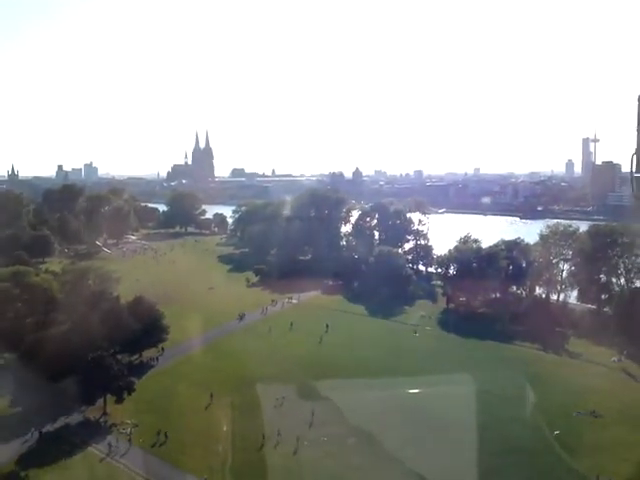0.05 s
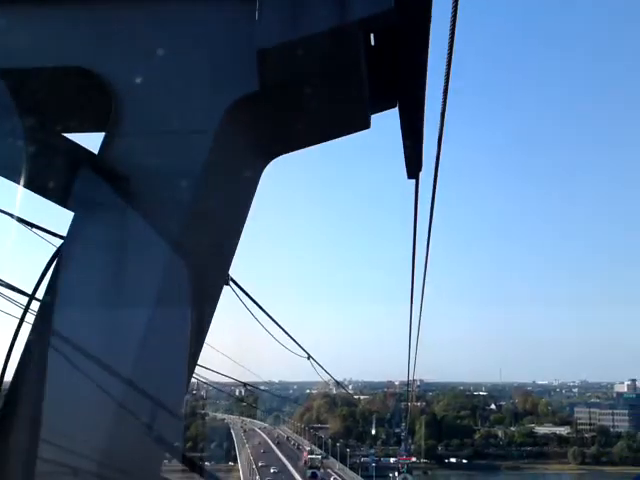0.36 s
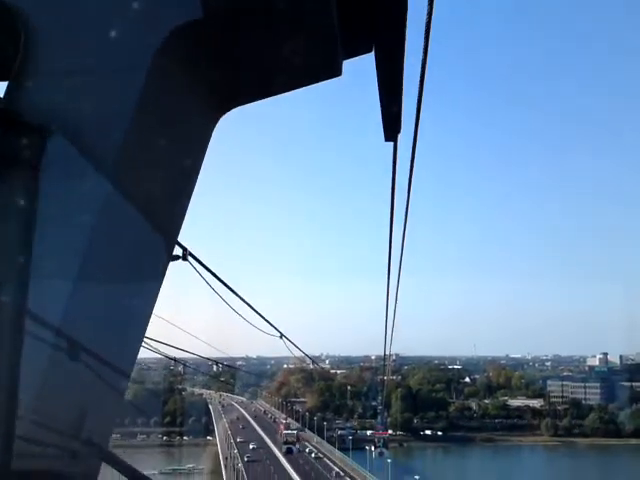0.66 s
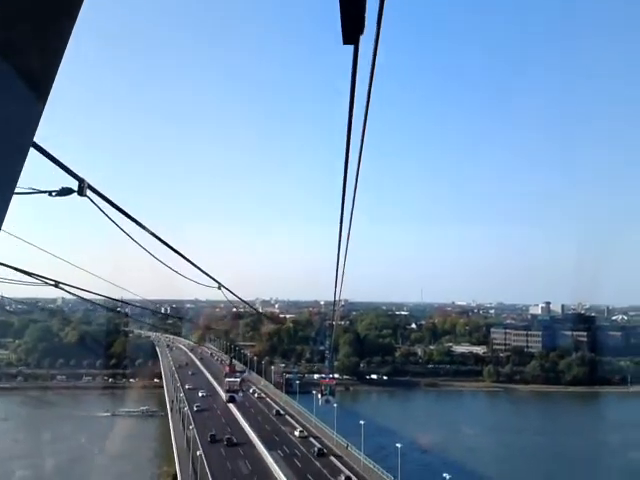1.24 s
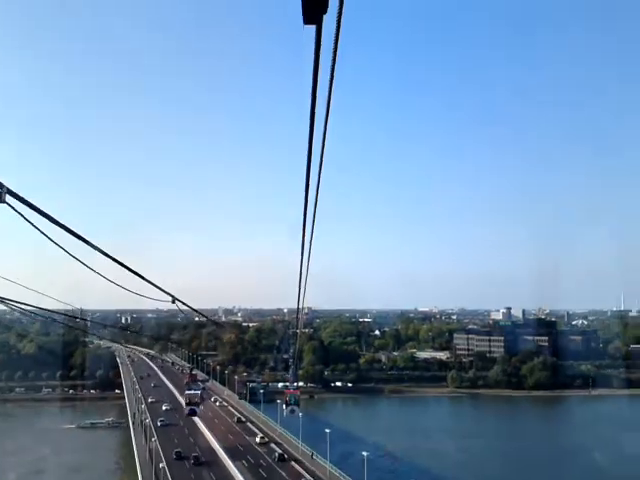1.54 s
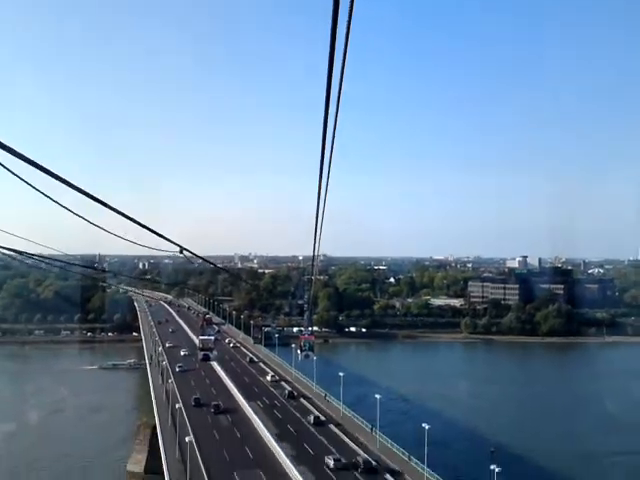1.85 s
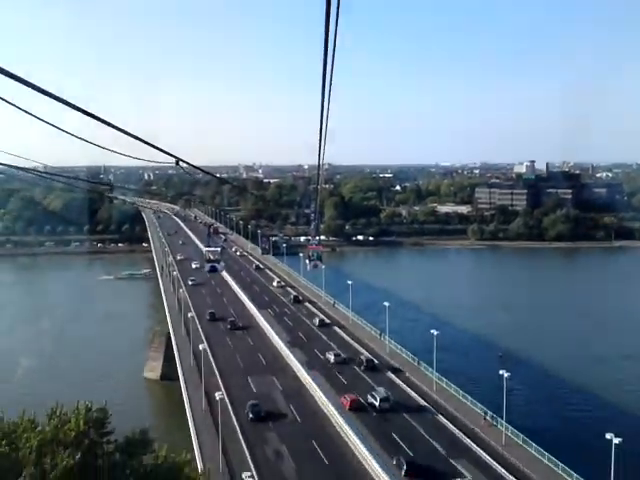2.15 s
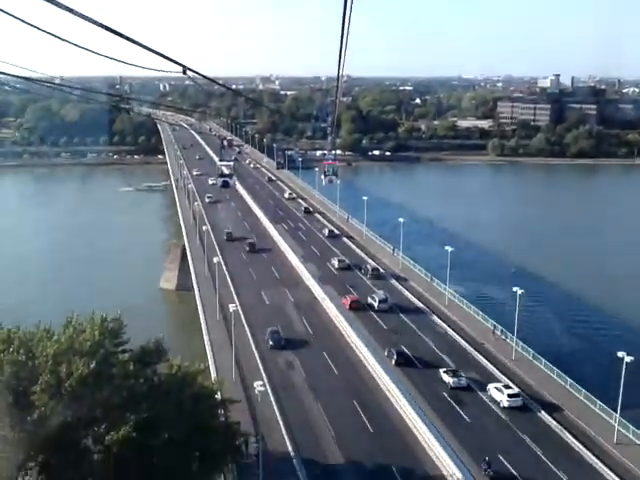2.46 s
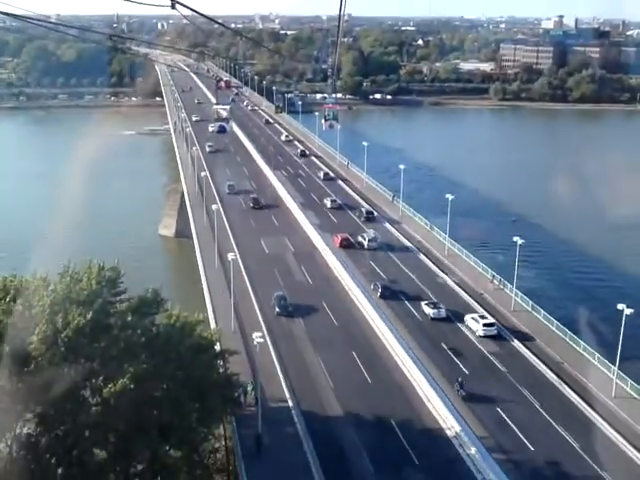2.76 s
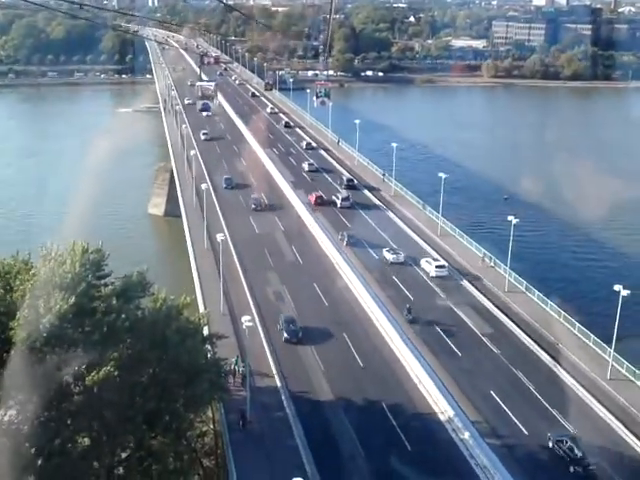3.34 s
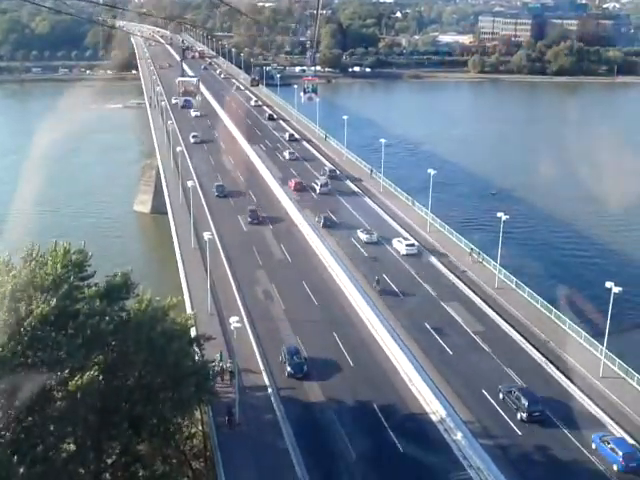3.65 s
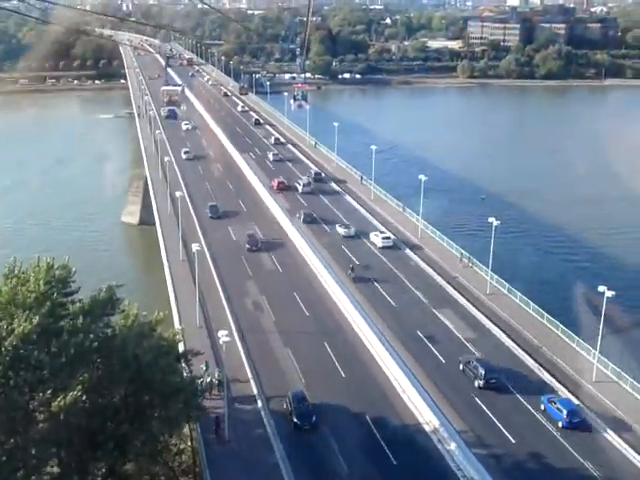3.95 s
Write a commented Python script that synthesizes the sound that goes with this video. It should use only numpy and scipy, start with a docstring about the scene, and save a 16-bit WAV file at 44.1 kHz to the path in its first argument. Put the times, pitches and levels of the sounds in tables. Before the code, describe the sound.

Low rumble of wind and running gear fills a moving cable car cabin, the microphone inside. After one close click, it swells with a droning rope and several knocks on the walls, while traffic washes softly far below.

```python
"""Cable car cabin over a river.

Wind and running gear shake the cabin; its low resonances rumble in swells. The haul rope drones and
the gear hums, both climbing a little. Traffic washes in from far below, something small rubs and
clicks close by, and jolts knock the walls. The sound cuts out twice, very briefly, at the start."""
import sys
import numpy as np
from scipy import signal
from scipy.fft import rfft, irfft
from scipy.io import wavfile
from scipy.ndimage import uniform_filter1d

SR = 44100
rng = np.random.default_rng(int(sys.argv[2]) if len(sys.argv) > 2 else 0)


def generate_wav(signal):
    """Clip the signal to [-1, 1] and save it as 16-bit WAV at the path in sys.argv[1]."""
    frames = np.transpose(np.atleast_2d(signal))
    scaled = np.clip(frames, -1, 1) * 32767
    pcm = np.round(scaled).astype(np.int16)
    wavfile.write(sys.argv[1], SR, pcm)


N = 176400

# Cabin shaking. Each row: time in seconds, gain in dB.
CABIN_SHAKE = [(0, -6.5), (.22, -5.5), (.28, -6.5), (.42, 0.5), (.53, -4), (.85, -4.5), (.97, -1),
               (1.07, -4), (1.38, -6), (1.48, 1.5), (1.6, -6.5), (1.72, 4.5), (1.88, 3.5), (2.05, -2),
               (2.15, 2), (2.25, 8.5), (2.42, 2), (2.55, 6), (3.15, 1), (3.3, 0.5), (3.41, 7), (3.51, -3),
               (3.66, 8.5), (3.82, 2.5), (4, 0.5)]
# Cabin resonances. Each row: centre in Hz, width in Hz, relative level in dB.
CABIN_MODES = [(26.3, 6.1, -9.5), (50.45, 2.8, -3), (72.6, 9.8, 1), (123.4, 22, -4.5), (158.9, 10, -2),
               (209.6, 16, -9.5), (239.9, 11, -5.5), (298.6, 32, -4), (348, 15, -14)]
# Broad rumble between them. Each row: frequency in Hz, relative density in dB.
RUMBLE_SPECTRUM = [(12, -24.5), (26, -1), (36, -7), (48, -3), (90, 4), (190, -5), (330, -7), (450, -10.5),
                   (650, -16.5), (1200, -29), (2500, -79)]
# Haul rope drone. Each row: time in seconds, pitch in Hz, level in dB.
ROPE_TRACK = [(0, 121.3, -71), (.6, 121, -60), (.8, 121, -54.5), (1.15, 119.9, -53.5), (1.7, 120, -50.5),
              (1.82, 121.1, -47), (1.96, 119.2, -44.5), (2.1, 121, -54), (2.36, 122.3, -41.5),
              (2.5, 121.5, -47), (2.65, 122.5, -51), (2.85, 124.6, -48), (3.2, 124.8, -46.5),
              (3.33, 123.7, -48), (3.55, 125.4, -50.5), (4, 124.9, -51.5)]
# Running gear hum. Each row: time in seconds, pitch in Hz, level in dB.
GEAR_TRACK = [(0, 293, -44.5), (.15, 282.8, -54), (.2, 289.8, -43.5), (.3, 297, -50.5), (.48, 295.8, -60),
              (.58, 292, -48), (.75, 291, -47.5), (.92, 292.5, -43.5), (1.03, 292.9, -61), (1.12, 290, -45),
              (1.26, 293.5, -64.5), (1.35, 292, -48.5), (1.55, 290, -62.5), (1.97, 289.3, -63),
              (2.066, 290, -41.5), (2.11, 290.6, -48.5), (2.18, 288.5, -44.5), (2.3, 291.8, -38.5),
              (2.39, 292, -47.5), (2.51, 298.7, -39.5), (2.66, 305.1, -57.5), (2.745, 309.3, -44.5),
              (2.79, 308, -47.5), (2.85, 304.5, -40), (2.97, 306, -49), (3.03, 310.7, -40.5),
              (3.3, 307, -45), (3.55, 301.7, -50.5), (3.75, 305.6, -49.5), (4, 308, -45.5)]
# Tones heard until the second gap. Each row: pitch in Hz, level in dB.
EARLY_TONES = [(205, -54.5), (250, -58), (368, -58), (436, -61.5), (500, -59.5), (874, -65)]
# Distant traffic and air. Each row: frequency in Hz, relative density in dB.
TRAFFIC_SPECTRUM = [(100, -3.5), (400, 8), (700, 1), (1000, 2.5), (1600, 1), (2100, -3.5), (2700, -11.5),
                    (3400, -18), (4200, -23), (5000, -29), (7000, -43.5), (9000, -36.5), (10500, -49),
                    (13000, -64)]
# Hollow cabin colour on the traffic. Each row: centre in Hz, width in Hz, relative level in dB.
HOLLOW_MODES = [(484.5, 14, -3.5), (598.3, 17, -0.5), (941, 140, 0), (1058, 150, -2), (1584, 85, -2.5)]
# Faint rubs. Each row: centre in seconds, Gaussian half-width in seconds, level in dB.
RUB_EVENTS = [(0.089, .004, -71), (0.705, .025, -75.5), (0.762, 0.014, -66), (1.272, 0.0054, -76),
              (1.771, 0.014, -73), (2.25, 0.012, -80), (2.659, .015, -77), (3.421, 0.019, -71.5)]
# Hiss of the rubs. Each row: frequency in Hz, relative density in dB.
RUB_SPECTRUM = [(1500, -12), (3800, 5), (5500, -5.5), (7500, -2.5), (9500, -10.5), (11000, -22),
                (15000, -40.5)]
# Near-silent gaps. Each row: start in seconds, end in seconds.
GAP_SPANS = [(0.157, .175), (.218, .261)]
# Small hard clicks. Each row: start in seconds, peak in dB.
CLICK_EVENTS = [(0.2179, -42), (0.7667, -29.5), (0.771, -31), (0.7829, -16.5), (0.7851, -29.5)]
# Ring of a click. Each row: frequency in Hz, relative level in dB, T60 in seconds.
CLICK_RING = [(770, -3, 0.009), (1020, 10.5, 0.0043), (1620, 14, 0.0026), (2640, 19.5, 0.0036),
              (3740, 17.5, 0.0021), (7000, 18, 0.0014)]
# Knocks on the cabin. Each row: start in seconds, wall level in dB, thud level in dB.
KNOCK_EVENTS = [(1.470, -58, -35), (1.74, -46, -40), (1.795, -53, -35), (1.837, -33, -40),
                (2.215, -26.5, -44), (2.252, -49, -37), (2.306, -35.5, -31), (2.499, -32, -32),
                (2.625, -42, -46.5), (2.653, -41, -41), (3.368, -47, -38), (3.601, -31.5, -32.5),
                (3.643, -33, -40.5), (3.728, -32.5, -42), (3.880, -34.5, -33), (3.902, -32, -45)]
# Ring of a knocked wall. Each row: frequency in Hz, relative level in dB, T60 in seconds.
WALL_RING = [(350, 6, 0.054), (420, -7.5, 0.03), (628, 0.5, 0.062), (674, -3.5, 0.12), (1000, -0.5, 0.026),
             (1085, -2.5, 0.053), (1350, -3.5, .025)]
# Thud of the whole cabin. Each row: frequency in Hz, relative level in dB, T60 in seconds.
THUD_RING = [(50.7, -5.5, 0.21), (73.6, -1.5, 0.077), (121, -1, 0.24), (174, -3.5, 0.17), (246, -1, 0.032)]
# Jolts to the walls. Each row: start in seconds, time until release in seconds, level in dB.
JOLT_EVENTS = [(1.699, 0.12, -53.5), (1.817, 0.071, -50.5), (2.211, .085, -45.5), (2.498, 0.04, -49.5),
               (2.624, 0.25, -51.5), (3.389, 0.037, -60), (3.597, 0.13, -43), (3.86, 0.05, -50.5)]
# Wall panel resonances. Each row: centre in Hz, width in Hz, relative level in dB.
PANEL_MODES = [(249, 31, 4.5), (317.3, 32, 6.5), (444, 22, -8.5), (531, 34, -16), (613.3, 34, 2),
               (718.7, 26, -1.5), (913, 12, -6.5), (1105, 89, -3.5), (1150, 180, -18)]

CABIN_DB, RUMBLE_DB = -46, -52.5  # at 0 dB of shake
TONE_WAVER_DB, TONE_JITTER_RATIO = 1.5, 0.0083
ROPE_OCTAVE_DB = -9.5
TRAFFIC_DB, HOLLOW_DB = -52.5, -60.5
TRAFFIC_FLICKER_DB, EARLY_TRAFFIC_GAIN_DB = 0.03, -2
RUSTLE_DB, RUSTLE_FLICKER_DB = -84.5, 1.5
CLICK_BAND_HZ, CLICK_CONTACT_S = (614, 7400), 0.00008
KNOCK_CONTACT_S = 0.00073
JOLT_ATTACK_S, JOLT_RELEASE_S = 0.0087, 0.069
GAP_GAIN_DB, GAP_EDGE_S, SECOND_GAP_S = -44, 0.0031, GAP_SPANS[-1][0]
NOTCH_HZ, NOTCH_WIDTH_HZ, LOWPASS_HZ = 5540, 640, 15000
TIME_S = np.arange(N) / SR


def undb(db):
    """Decibels to gain."""
    return 10 ** (np.asarray(db) / 20)


def unit_rms(x):
    """Scale to an rms of 1."""
    return x / np.sqrt(np.mean(x ** 2))


def curve(table, column=1):
    """One table column, linearly interpolated in time."""
    rows = np.array(table, float)
    return np.interp(TIME_S, rows[:, 0], rows[:, column])


def wander(rate_hz):
    """Smooth random drift, rms 1."""
    hold = int(SR / rate_hz)
    steps = np.repeat(rng.standard_normal(N // hold + 1), hold)
    return unit_rms(uniform_filter1d(uniform_filter1d(steps, hold), hold)[:N])


def filtered_noise(response):
    """White noise through a frequency response, rms 1."""
    return unit_rms(irfft(rfft(rng.standard_normal(N)) * response, N))


def coloured_noise(spectrum):
    """Noise shaped by (Hz, dB) points on a log frequency axis."""
    rows, hz = np.array(spectrum, float), np.arange(N // 2 + 1) * SR / N
    return filtered_noise(undb(np.interp(np.log(hz + 1), np.log(rows[:, 0]), rows[:, 1])))


def resonances(modes):
    """Steep-sided resonances, each driven by its own noise; total rms 1."""
    hz, out = np.arange(1, N // 2 + 2) * SR / N, 0
    for centre_hz, width_hz, db in modes:
        detuning = (hz / centre_hz - centre_hz / hz) * centre_hz / (2 * width_hz)
        out += undb(db) * filtered_noise(1 / (1 + 1j * detuning) ** 2)
    return unit_rms(out)


def struck(modes, age_s):
    """Modes decaying after a blow, peak 1."""
    ring = sum(undb(db) * np.sin(2 * np.pi * hz * age_s) * np.exp(-np.log(1000) * age_s / t60_s)
               for hz, db, t60_s in modes)
    return ring / np.abs(ring).max()


def wavering_tone(hz):
    """A sine drifting in pitch and level, rms near 1."""
    pitch_hz = hz * (1 + TONE_JITTER_RATIO * wander(rate_hz=25.02))
    cycles = np.cumsum(pitch_hz) / SR + rng.random()
    return np.sqrt(2) * np.sin(2 * np.pi * cycles) * undb(TONE_WAVER_DB * wander(rate_hz=18))


def cabin_rumble():
    """The cabin booms in its low resonances, as hard as it is shaken."""
    boom = undb(CABIN_DB) * resonances(CABIN_MODES)
    rumble = undb(RUMBLE_DB) * coloured_noise(RUMBLE_SPECTRUM)
    return undb(curve(CABIN_SHAKE)) * (boom + rumble)


def rope_drone():
    """The moving rope drones through the hanger: a low note and its octave."""
    pitch_hz, level_db = curve(ROPE_TRACK), curve(ROPE_TRACK, column=2)
    note = wavering_tone(pitch_hz)
    octave = undb(ROPE_OCTAVE_DB) * wavering_tone(2 * pitch_hz)
    return undb(level_db) * (note + octave)


def early_tones():
    """Faint tones that stop at the second gap."""
    return sum(undb(db) * wavering_tone(hz) for hz, db in EARLY_TONES) * (TIME_S < SECOND_GAP_S)


def gear_hum():
    """The running gear hums on one gliding note."""
    pitch_hz, level_db = curve(GEAR_TRACK), curve(GEAR_TRACK, column=2)
    return undb(level_db) * wavering_tone(pitch_hz)


def traffic():
    """Tyre wash from far below, coloured by the cabin; weaker before the second gap."""
    gain_db = TRAFFIC_FLICKER_DB * wander(rate_hz=54) + EARLY_TRAFFIC_GAIN_DB * (TIME_S < SECOND_GAP_S)
    wash = undb(TRAFFIC_DB) * coloured_noise(TRAFFIC_SPECTRUM)
    hollow = undb(HOLLOW_DB) * resonances(HOLLOW_MODES)
    return undb(gain_db) * (wash + hollow)


def rubs():
    """Soft, brief scuffs of hiss over a faint, uneven rustle."""
    rustle = undb(RUSTLE_DB + RUSTLE_FLICKER_DB * wander(rate_hz=18))
    scuffs = sum(undb(db) * np.exp(-((TIME_S - centre_s) / half_width_s) ** 2 / 2)
                 for centre_s, half_width_s, db in RUB_EVENTS)
    return coloured_noise(RUB_SPECTRUM) * np.hypot(rustle, scuffs)


def clicks():
    """A hard part, too small to give bass, ticks and snaps home, ringing for milliseconds."""
    age_s, out = np.arange(SR // 20) / SR, np.zeros(N + SR)
    contact = 1 - np.exp(-age_s / CLICK_CONTACT_S)
    band = signal.butter(3, CLICK_BAND_HZ, "band", fs=SR, output="sos")
    ring = signal.sosfilt(band, struck(CLICK_RING, age_s) * contact)
    for start_s, peak_db in CLICK_EVENTS:
        first = int(start_s * SR)
        out[first:first + len(ring)] += undb(peak_db) * ring / np.abs(ring).max()
    return out[:N]


def knocks():
    """Each knock rings the wall panels over a low thud of the whole cabin."""
    age_s, out = np.arange(SR // 4) / SR, np.zeros(N + SR)
    wall, thud = struck(WALL_RING, age_s), struck(THUD_RING, age_s)
    contact = 1 - np.exp(-age_s / KNOCK_CONTACT_S)
    for start_s, wall_db, thud_db in KNOCK_EVENTS:
        first = int(start_s * SR)
        out[first:first + len(age_s)] -= contact * (undb(wall_db) * wall + undb(thud_db) * thud)
    return out[:N]


def panel_shudder():
    """Each jolt sets the walls shuddering; they hold, then die away."""
    drive = 0
    for start_s, length_s, db in JOLT_EVENTS:
        age_s = np.maximum(TIME_S - start_s, 0)
        attack = np.minimum(age_s / JOLT_ATTACK_S, 1)
        release = np.exp(-np.maximum(age_s - length_s, 0) / JOLT_RELEASE_S)
        drive += undb(db) * attack * release
    return drive * resonances(PANEL_MODES)


def scene():
    """All sources in the cabin, mono."""
    body = cabin_rumble() + panel_shudder() + knocks()
    tones = rope_drone() + early_tones() + gear_hum()
    return (body + tones + traffic() + clicks() + rubs())[None]


def record(dry):
    """Two brief cut-outs, a treble notch applied twice, and a steep low-pass."""
    in_gap = sum(1. * ((TIME_S > start_s) & (TIME_S < end_s)) for start_s, end_s in GAP_SPANS)
    mute = uniform_filter1d(in_gap, int(GAP_EDGE_S * SR))
    gated = dry * (1 - mute * (1 - undb(GAP_GAIN_DB)))
    notch = signal.iirnotch(NOTCH_HZ, NOTCH_HZ / NOTCH_WIDTH_HZ, fs=SR)
    notched = signal.lfilter(*notch, signal.lfilter(*notch, gated))
    return signal.sosfilt(signal.butter(10, LOWPASS_HZ, fs=SR, output="sos"), notched)


dry = scene()
out = record(dry)
generate_wav(out)
```